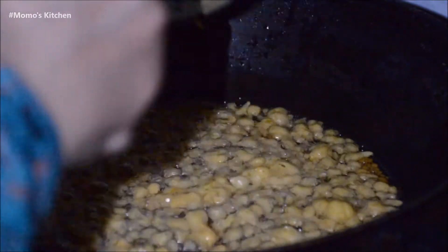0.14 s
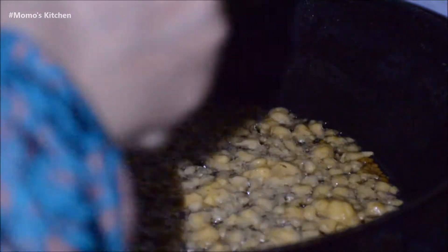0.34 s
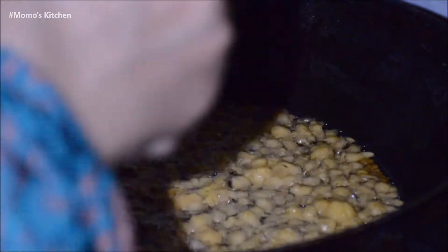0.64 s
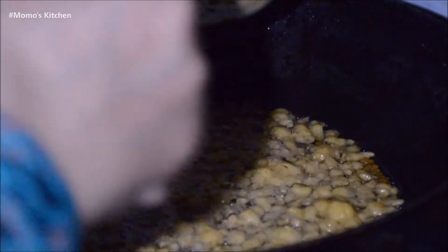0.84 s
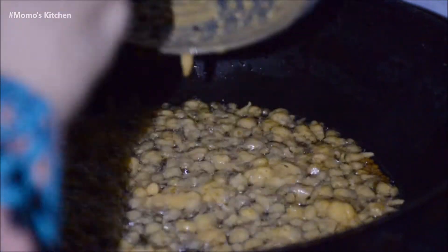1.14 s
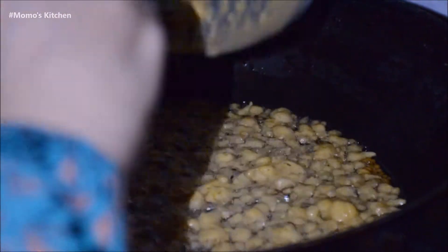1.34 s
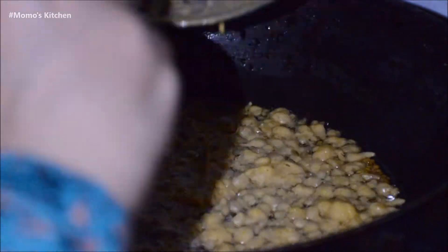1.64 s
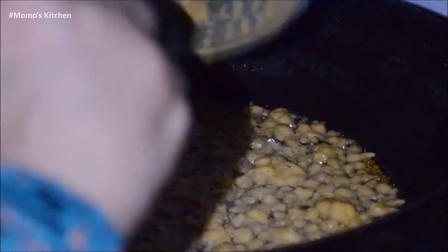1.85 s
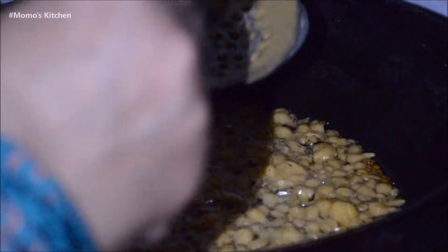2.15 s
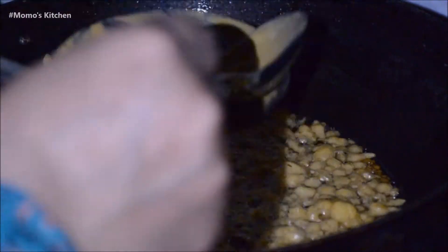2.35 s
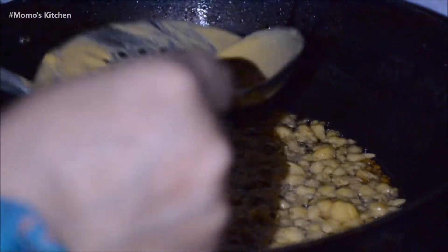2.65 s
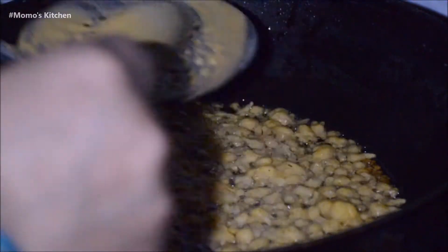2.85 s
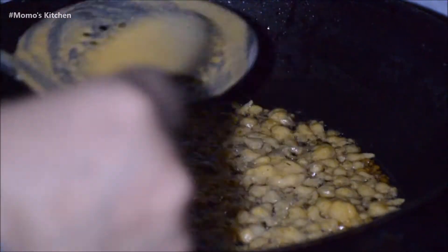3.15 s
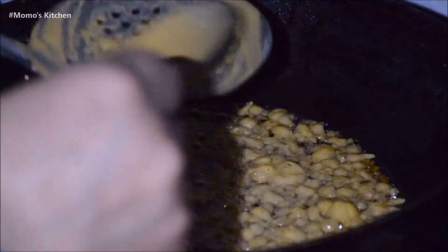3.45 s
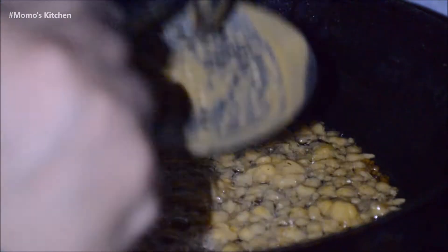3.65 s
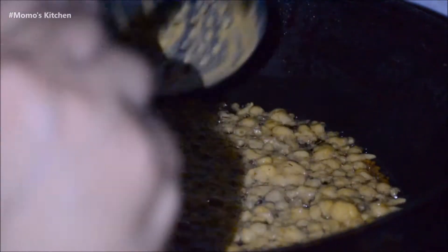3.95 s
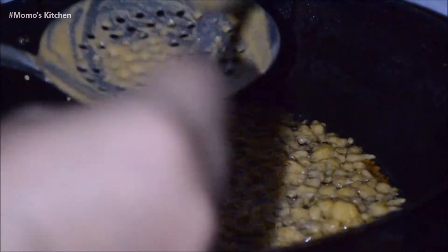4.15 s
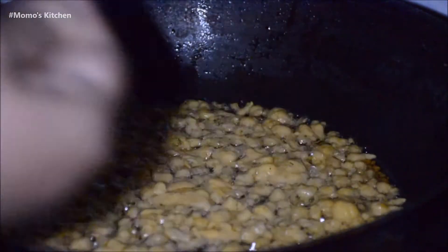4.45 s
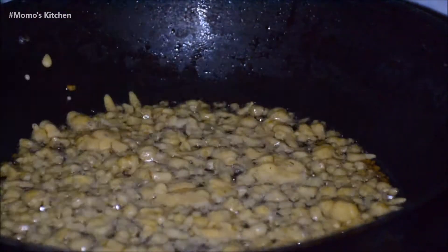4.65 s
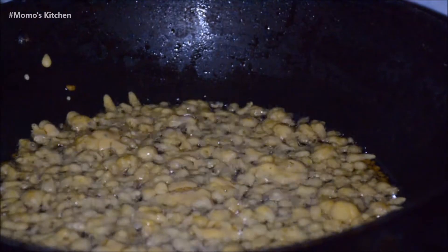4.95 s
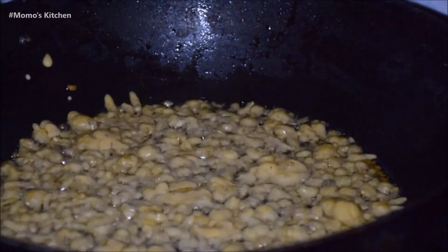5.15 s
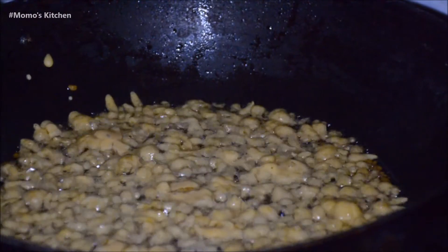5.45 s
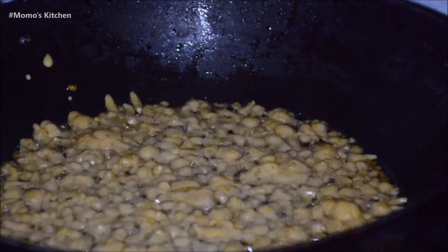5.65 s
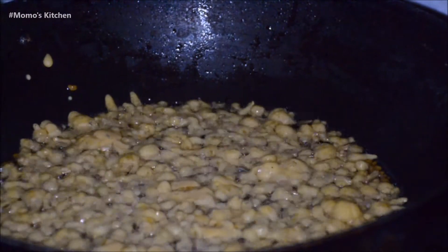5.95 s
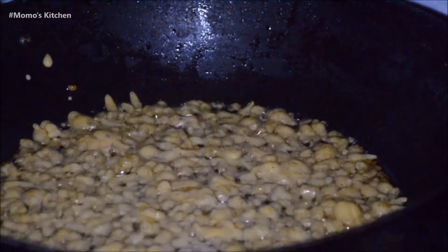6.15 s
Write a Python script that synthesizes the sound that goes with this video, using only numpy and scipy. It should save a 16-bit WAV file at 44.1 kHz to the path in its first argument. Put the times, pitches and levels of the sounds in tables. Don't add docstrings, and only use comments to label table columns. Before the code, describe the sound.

Four quick, growing metallic raps of a spoon on a batter-wet slotted ladle in a live kitchen, then a light pan tap and faint set-down clatter.

```python
import sys
import numpy as np
from scipy import signal
from scipy.fft import rfft, irfft
from scipy.io import wavfile
from scipy.ndimage import uniform_filter1d

SR = 44100
rng = np.random.default_rng(int(sys.argv[2]) if len(sys.argv) > 2 else 0)


def linear_from_db(decibels):
    return 10 ** (np.asarray(decibels, float) / 20)


def wrap_up_sound(samples):
    columns = np.atleast_2d(samples).T
    tamed = np.clip(columns, -1, 1)
    steps = np.round(tamed * 32767).astype(np.int16)
    wavfile.write(sys.argv[1], SR, steps)


N = 278271

# start_s, peak_db, contact_ms, treble_lift_db, ring_db (ring compared with the contact)
LADLE_RAPS = [
    (1.3143, -15, 3.47, 5.5, -11.5),
    (1.4693, -11.5, 4.1, 3, -10.5),
    (1.6463, -10.5, 3.94, 6.5, -13),
    (1.837, -9, 4, 6.5, -15),
]
EDGE_TAPS = [
    (4.29, -27, 4.5, 0., -9),
]
HANDLE_TICKS = [
    (2.7956, -35.5, 4.6, 0., -14),
]
BOWL_CLATTER = [
    (4.959, -40.5, 49, -11, -6.5),
    (4.973, -35, 5.6, 1, -5),
    (5.047, -41, 9.8, -6, 1.5),
]
LIP_SETTLES = [
    (5.040, -28.5, 4.62, 0., -13.5),
]
COUNTER_THUDS = [
    (5.305, -49, 20, 3, -9),
    (5.321, -42, 11., -3, -9),
    (5.568, -51.5, 14, -12, -0.5),
]
LID_CLINKS = [
    (5.559, -38.5, 6.4, 0, -1.5),
]
SOFT_BRUSHES = [
    (.301, -56, 6.9, 15, -15),
    (.695, -58, 8.9, 3, -15.),
    (.745, -58.5, 28, -3, -15.),
    (.777, -55.5, 15, 3, -10),
    (2.176, -58, 17, 5, -11),
    (2.488, -55.5, 14., 3, -4),
    (4.043, -59, 4.3, 15, -12),
    (4.255, -61, 9., -6, -10.),
]
RIM_SLIPS = [
    (.990, -51.5, 3., -14, 6),
    (.993, -52.5, 45., 9, -20.),
    (1.003, -57, 3.7, -9., -4),
    (1.008, -52, 5.1, -4, 2),
    (1.013, -52, 4.8, -12, 5),
    (1.042, -53, 6.3, 5, -2),
]

# pitch_hz, level_db (per Hz)
LADLE_COLOURS = [
    [(180, -67.5), (300, -24), (612, -12.5), (1080, -3), (2020, -4), (2730, 1.5), (3330, -14.5), (3670, -2),
     (5380, -22), (6140, -16), (7620, -18.5), (9460, -18.5), (14100, -34), (15800, -39)],
    [(180, -47), (300, -35), (1060, -0.5), (1600, -2.5), (2680, 2.5), (2960, -5), (3740, -2.5),
     (4060, -20.5), (4710, -8), (6680, -21), (7750, -4.5), (9780, -16.5), (13200, -17.5), (15800, -39)],
    [(180, -78), (300, -24.5), (602, -10), (711, -4.5), (1600, -1.5), (1740, -1), (2730, 1.5), (3330, -8),
     (3610, -3.5), (4870, -18.5), (6250, -8.5), (6790, -15), (10300, -19), (15800, -40)],
    [(180, -50), (300, -23), (612, -10), (711, -1), (1740, 2.5), (1920, 0.5), (3110, 2), (3440, -13.5),
     (3860, 1), (4630, -13), (8150, -9), (9300, -16.5), (13200, -18.5), (15800, -53.5)],
]
EDGE_COLOUR = [(400, -33), (900, -15), (1700, -9.5), (2700, -3), (3300, -4), (3950, 1), (5000, -14.5),
               (6600, -8), (9000, -14.5), (15900, -32)]
HANDLE_COLOUR = [(600, -35), (1540, -1), (1900, -7), (2400, -10.5), (3370, 5), (4000, -8), (4500, -22),
                 (6000, -7), (7500, -17), (9000, -13.5), (15900, -33)]
BOWL_COLOUR = [(200, -25), (340, -8), (600, -10), (860, 1), (1150, -5), (1550, 2), (2000, -8), (2680, 0),
               (4300, -17), (5500, -20), (11000, -20), (15900, -40)]
LIP_COLOUR = [(500, -23), (1200, -10), (2200, -5), (3100, 2.5), (4200, -19.5), (5500, -17), (9000, -24),
              (15900, -34)]
COUNTER_COLOUR = [(150, -28), (250, -16), (1170, -4.5), (2010, -20), (2630, -13.5), (3300, -35),
                  (3950, -38), (9000, -30), (11700, -60), (19800, -120)]
LID_COLOUR = [(210, -63), (350, -22), (712, -3), (1970, -9), (2470, -6), (2860, -17), (4390, -9.5),
              (5090, -19), (12000, -39), (15600, -71), (22000, -120)]
SOFT_COLOUR = [(1500, -39), (3000, 9), (4300, -8), (7000, -6), (10000, -10.5), (15900, -21)]
RIM_COLOUR = [(1500, -27), (2500, -21), (3000, 10.5), (4600, -12), (6000, -3), (7500, -14), (8700, -5),
              (10500, -18), (12800, -15), (15900, -29)]

# pitch_hz, level_db, t60_s (time to fall by 60 dB)
LADLE_TONES = [(545, -13, .1), (730, -11, .09), (1265, -15, .25), (1775, -8, .05), (2400, -2, .03),
               (2655, -10, .16), (3090, -3, .022), (3632, -18, .38), (3675, -13, .24), (3955, -4, .028),
               (4650, -12, .035), (6150, -8, .025), (8200, -10, .015)]
EDGE_TONES = [(2276, -4, .1), (2450, -5, .05), (2690, 3, .11), (2900, -5, .05), (3700, -10, .04),
              (3955, 0, .02), (4550, -9, .05), (5400, -13, .07), (6450, -10, .09)]
HANDLE_TONES = [(1540, -10, 0.1), (1910, -5, 0.06), (3300, -10, 0.027), (3440, -5, .03), (4040, -8, 0.041)]
BOWL_TONES = [(340, -14, .1), (860, -4, .12), (1080, -7, .07), (1555, -1, .1), (2650, -2, .09),
              (3950, -6, .06), (5420, -12, .08), (5500, -13, .15), (7280, -13, .08)]
LIP_TONES = [(2260, -8, .08), (2640, -3, .085), (3050, 0, .03), (3400, -2, .03), (3950, -6, .06),
             (5410, -8, .08), (5490, -7, .18), (7280, -12, .09)]
COUNTER_TONES = [(540, 0, 0.12), (672, 0, 0.11), (960, -19, 0.051), (1292, -4, 0.041), (2640, -13, 0.089)]
LID_TONES = [(1390, -6, .05), (2420, 0, .03), (3187, -4, .05), (4387, -2, .02)]
SOFT_TONES = [(4220, 1, 0.036), (6560, -5, .02)]
RIM_TONES = [(2485, -2, 0.048), (2830, 4, 0.035), (3030, 4, 0.035), (3470, -19, .05), (4070, -12, .05)]

# start_s, length_s, pitch_hz, level_db, octave_db (octave compared with the tone)
SQUEAK_SLIPS = [
    (3.625, 0.13, 1122, -57, -8.5),
    (3.725, .1, 1098, -62.5, -20),
    (3.82, 0.099, 1115, -58.5, -5.5),
    (3.9, 0.054, 1388, -58, -25),
    (2.8, .05, 1290, -66, -22),
    (4.4, .06, 1310, -64, -25),
    (4.035, .075, 1365, -59.5, -24),
    (4.5, .11, 1300, -67, -10),
    (4.17, .08, 1840, -66.5, -18),
    (3.27, .09, 650, -64, -25),
]
# start_s, length_s, pitch_hz, level_db
STEAM_PUFFS = [(.59, .13, 3170, -75), (.74, .08, 3205, -73), (.82, .05, 3215, -67), (.86, .12, 3205, -74),
               (1.21, 0.098, 3160, -73), (2.03, .045, 3150, -69), (2.085, .14, 3184, -66),
               (2.25, 0.096, 3160, -70), (2.37, .06, 3170, -79), (.53, .2, 2840, -79), (.8, .17, 2840, -77),
               (1.15, .12, 2830, -79), (2.27, .055, 2800, -73)]
# middle_s, pitch_hz, level_db, length_s
STAND_BUMP = (4.66, 45, -63, .1)
# pitch_hz, level_db (per Hz)
HUSH_COLOUR = [(13, -37), (22, -3), (55, -7.5), (118, 0.5), (143, -65), (173, 1.5), (277, -6.5),
               (345, -4.5), (385, -3.5), (725, -4), (810, -0.5), (2120, -4), (4000, -17), (7320, -16),
               (15800, -31)]
# pitch_hz, width_hz, level_db
MOTOR_HUMS = [(49.5, 5.5, -85), (116.4, 1.02, -82), (180.2, 15, -87.5), (343.3, 29.4, -76),
              (510, 123, -74.5), (733.5, 14.3, -77)]
# pitch_hz, t60_s, colour_db
KITCHEN_ECHO = [(398, 0.65, -8), (1120, 0.42, 4.5), (1980, 0.38, 1.5), (3200, 0.36, -2.5),
                (5640, 0.36, 1.5), (8700, 0.32, -3.5), (14000, 0.23, 2)]


def ladle_raps():
    pairs = zip(LADLE_RAPS, LADLE_COLOURS)
    return sum(blows([rap], colour, LADLE_TONES) for rap, colour in pairs)


def blows(table, colour, ring):
    out, t, hz = np.zeros(N), np.arange(SR // 2) / SR, np.fft.rfftfreq(2048, 1 / SR)
    tone_hz, tone_db, t60 = np.transpose(ring + ring)[:, :, None]
    twin_db = np.repeat([0., 6.], len(ring))[:, None]
    for start, peak_db, contact_ms, treble_db, ring_db in table:
        lift = [(800, -0.27 * treble_db), (2200, 0), (6000, treble_db)]
        contact = rattle(np.clip(contact_ms, .5, 60) / 1000)
        crack = np.convolve(contact, causal(read(colour, hz) + read(lift, hz)))

        level_luck, phase_luck, pitch_luck = rng.standard_normal((3, len(tone_hz), 1))
        level_db = tone_db + read(lift, tone_hz) + 1.2 * level_luck - twin_db
        level_db = level_db - 60 * t / np.clip(t60, .01, .7)
        rise = 1 - np.exp(-t * tone_hz / 4)
        buzz = rng.standard_normal((len(tone_hz), len(t) // 150 + 1))
        buzz = buzz.repeat(150, axis=1)[:, :len(t)]
        rise = rise * (1 + .45 * uniform_filter1d(buzz, 150, axis=1))
        pitch = tone_hz * (1 + 0.003 * pitch_luck)
        waves = np.sin(2 * np.pi * pitch * t + 3 * phase_luck)
        tones = (linear_from_db(level_db) * rise * waves).sum(0)

        add(out, start, linear_from_db(peak_db) * crack / abs(crack).max())
        add(out, start, linear_from_db(peak_db + ring_db) * tones / abs(tones).max())
    return out


def rattle(held_s):
    t = np.arange(4096) / SR
    touch = (1 - np.exp(-t / 0.00025)) / (1 + (t / held_s) ** 4)
    x = rng.standard_normal(len(t))
    for _ in range(6):
        power = abs(uniform_filter1d(x ** 2, 60)) + 0.06 * np.mean(x[:200] ** 2)
        z = rfft(touch * x / np.sqrt(power))
        x = irfft(z / (abs(z) + 1e-9))
    return x * np.sqrt(touch)


def light_touches():
    tap = blows(EDGE_TAPS, EDGE_COLOUR, EDGE_TONES)
    slips = blows(RIM_SLIPS, RIM_COLOUR, RIM_TONES)
    return tap + slips + blows(SOFT_BRUSHES, SOFT_COLOUR, SOFT_TONES)


def handle_tick():
    return blows(HANDLE_TICKS, HANDLE_COLOUR, HANDLE_TONES)


def bowl_clatter():
    clatter = blows(BOWL_CLATTER, BOWL_COLOUR, BOWL_TONES)
    return clatter + blows(LIP_SETTLES, LIP_COLOUR, LIP_TONES)


def counter_thuds():
    return blows(COUNTER_THUDS, COUNTER_COLOUR, COUNTER_TONES)


def lid_clink():
    return blows(LID_CLINKS, LID_COLOUR, LID_TONES)


def distant_squeak():
    out = np.zeros(N)
    for row in SQUEAK_SLIPS:
        add(out, *squeal(*row, wobble=.009, flutter_db=3.5, rise=.015))
    return out


def steam_whistle():
    out = np.zeros(N)
    for row in STEAM_PUFFS:
        add(out, *squeal(*row, octave_db=-60, wobble=0.0022, flutter_db=2.2, rise=0))
    return out


def squeal(start, length, hz, level_db, octave_db, wobble, flutter_db, rise):
    t = np.arange(0, max(length, .02), 1 / SR)
    shake, flutter = (evened(uniform_filter1d(rng.standard_normal(SR), size))[:len(t)] for size in (200, 500))
    climb = rise * (2 * t / length - 1)
    turns = np.cumsum(hz * (1 + wobble * shake + climb)) / SR
    arch = np.sin(np.pi * t / t[-1]) ** 2
    tone = np.sqrt(arch) * np.sin(2 * np.pi * turns)
    tone = tone + linear_from_db(octave_db) * arch * np.sin(2 * np.pi * 2 * turns)
    fade_db = -3 * t / length
    return start, np.sqrt(2) * tone * linear_from_db(level_db + fade_db + flutter_db * flutter)


def bump():
    out, (middle, hz, db, length) = np.zeros(N), STAND_BUMP
    t = np.arange(0, length, 1 / SR)
    hump = np.sin(np.pi * t / length) ** 2
    add(out, middle - length / 2, linear_from_db(db) * np.sin(2 * np.pi * hz * t) * hump)
    return out


def hush():
    frames, hz = N // 256 + 5, np.fft.rfftfreq(1024, 1 / SR)
    a, b, patches = rng.standard_normal((frames, 513, 3)).T
    patches = uniform_filter1d(patches, 12, 0)
    patches = evened(uniform_filter1d(patches, 14, 1))
    z = (a + 1j * b) * linear_from_db(read(HUSH_COLOUR, hz)[:, None] + 0.9 * patches)
    noise = signal.istft(z, nperseg=1024, noverlap=768)[1][:N]
    air = linear_from_db(-62.5) * evened(noise)
    for f, width, db in MOTOR_HUMS:
        hum = resonate(rng.standard_normal(N), f, width)
        air += linear_from_db(db) * evened(resonate(hum, f, width))
    return air


def kitchen(x):
    taps = np.zeros(SR)
    at = np.arange(130, SR - 12, 12)
    taps[at + rng.integers(0, 12, len(at))] = rng.choice([-1., 1.], len(at))
    hz, t, z = signal.stft(taps, SR, nperseg=128)
    t60, colour_db = (read(np.array(KITCHEN_ECHO)[:, [0, k]], hz)[:, None] for k in (1, 2))
    walls = linear_from_db(-60 * t / t60)
    pan = linear_from_db(5.5 - 60 * t / 0.11)
    hall = linear_from_db(-23 - 60 * t / 0.95)
    z = z * (walls + pan + hall) * linear_from_db(colour_db)
    tail = signal.istft(z, SR, nperseg=128)[1]
    return signal.fftconvolve(x, tail / np.linalg.norm(tail))[:N]


def resonate(x, hz, width):
    turn = np.exp(2j * np.pi * np.cumsum(hz * np.ones(len(x))) / SR)
    r = np.exp(-np.pi * abs(width) / SR)
    return 2 * (turn * signal.lfilter([1 - r], [1, -r], x / turn)).real


def causal(gain_db):
    log_gain = np.log(linear_from_db(np.maximum(gain_db, -100)))
    full = np.r_[log_gain, log_gain[-2:0:-1]]
    return np.fft.ifft(np.exp(full - 1j * signal.hilbert(full).imag)).real[:len(gain_db)]


def evened(x):
    return x / np.sqrt(np.mean(x ** 2) + 1e-20)


def read(points, hz):
    f, value = np.transpose(points)
    return np.interp(np.log(hz + 1), np.log(f + 1), value)


def add(mix, start, sound):
    part = mix[round(start * SR):][:len(sound)]
    part += sound[:len(part)]


def scene():
    ladle, touches, tick = ladle_raps(), light_touches(), handle_tick()
    clatter, thuds, clink = bowl_clatter(), counter_thuds(), lid_clink()
    squeak = distant_squeak()

    direct = ladle + touches + tick + clatter + thuds + clink + 0.64 * squeak + steam_whistle()
    thrown = ladle + 1.08 * touches + 0.99 * tick + 0.74 * clatter + 1.04 * thuds + 0.62 * clink
    echoes = kitchen(linear_from_db(-3) * thrown + 0.53 * squeak)
    return (direct + echoes + hush() + bump())[None]


def roll_off(x):
    return signal.sosfilt(signal.butter(12, 15970, fs=SR, output="sos"), x)


def record(dry):
    taps = signal.firwin(201, 16000, fs=SR)
    smooth = signal.oaconvolve(dry, taps[None], "same")
    return roll_off(smooth)


dry = scene()
out = record(dry)
wrap_up_sound(out)
```